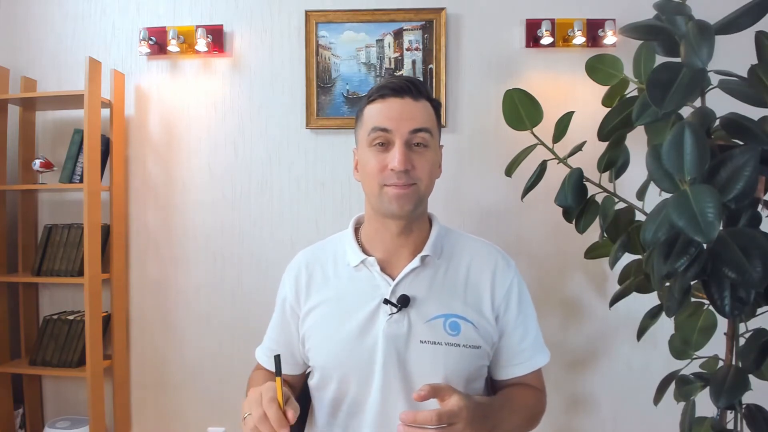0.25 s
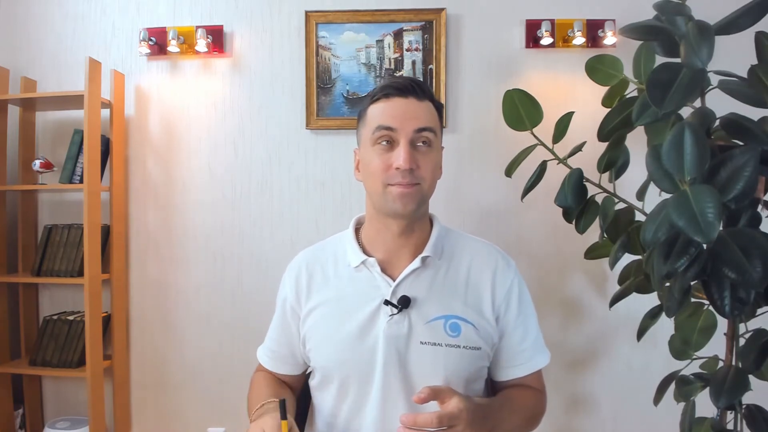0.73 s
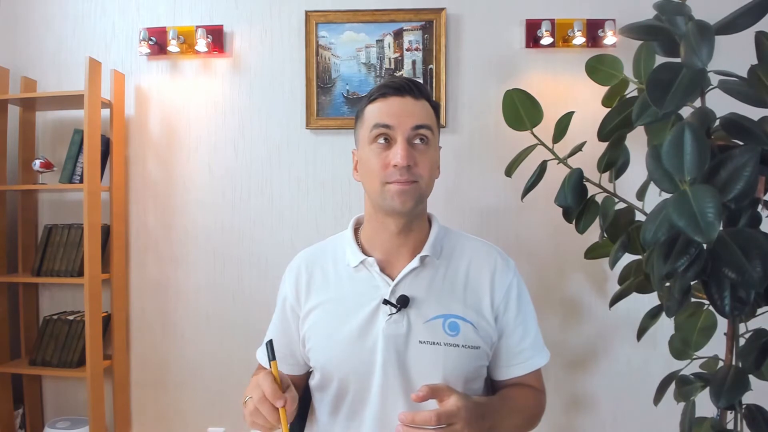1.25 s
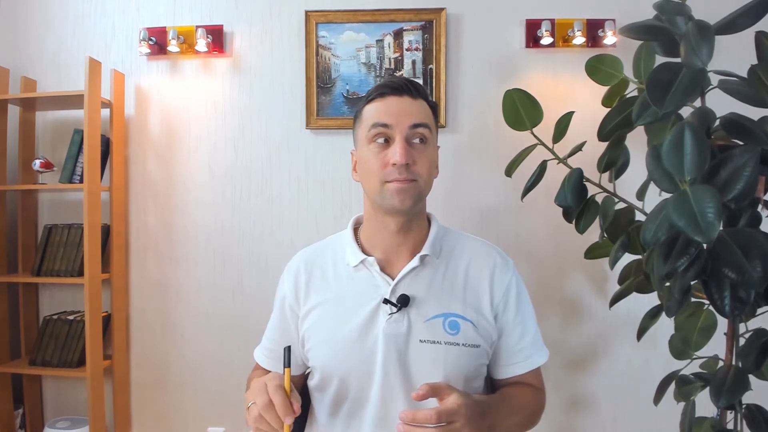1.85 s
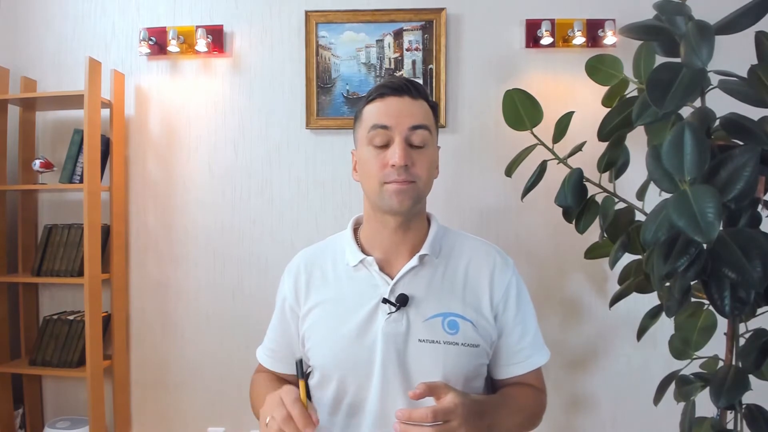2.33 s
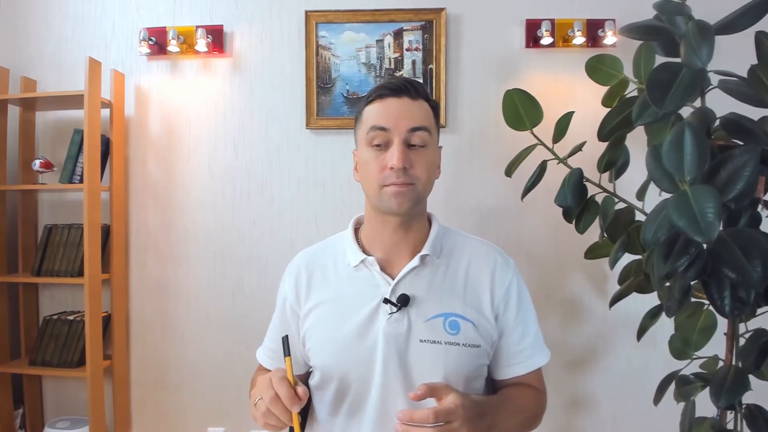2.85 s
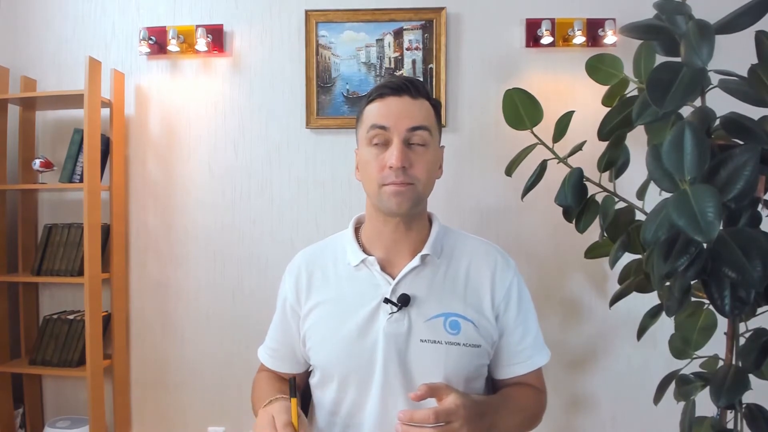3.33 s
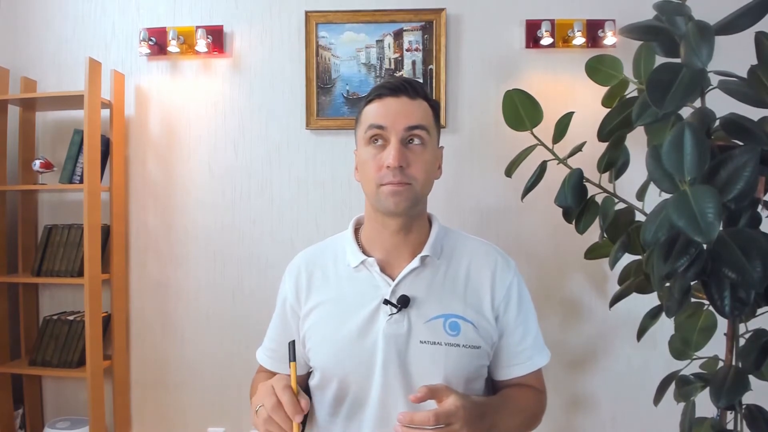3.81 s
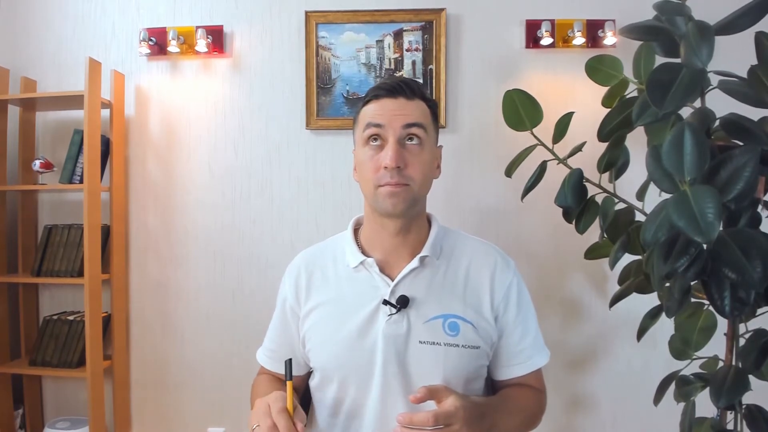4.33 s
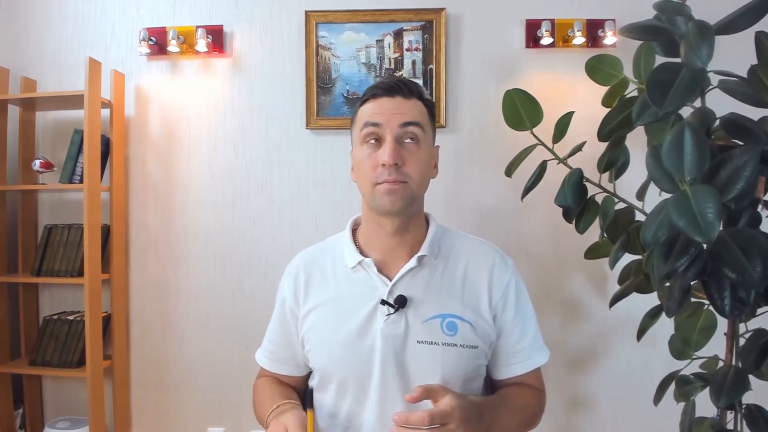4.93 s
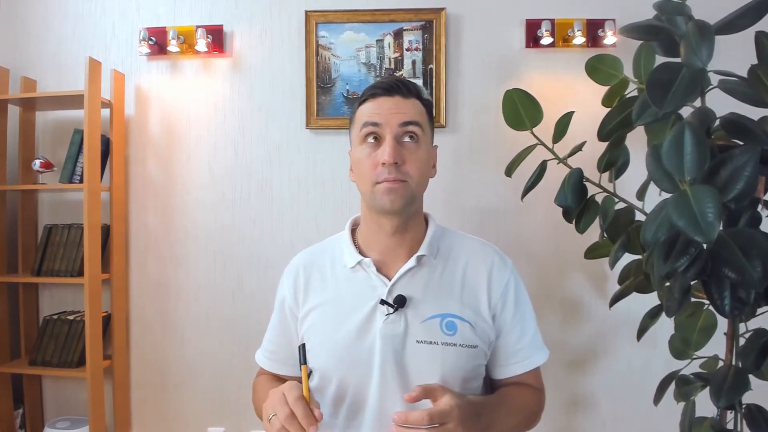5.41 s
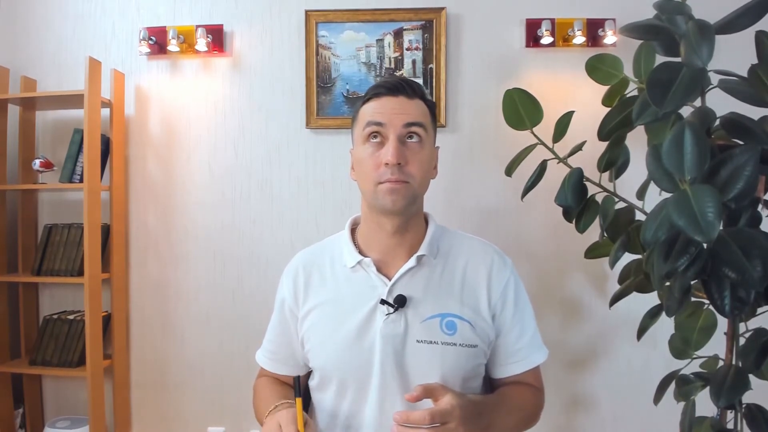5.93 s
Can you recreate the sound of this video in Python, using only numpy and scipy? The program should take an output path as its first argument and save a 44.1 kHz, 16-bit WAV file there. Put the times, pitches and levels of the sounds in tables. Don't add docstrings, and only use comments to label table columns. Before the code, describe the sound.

A pencil end knocks a hard desk top about every 0.84 seconds, crisp and dry with brief room ring, above quiet low hum.

```python
import sys
import numpy as np
from scipy import signal
from scipy.fft import rfft, irfft, next_fast_len
from scipy.io import wavfile
from scipy.ndimage import map_coordinates

SR = 44100
rng = np.random.default_rng(int(sys.argv[2]) if len(sys.argv) > 2 else 0)


def convert_level_to_amplitude(level_db):
    exponent = np.asarray(level_db, float) / 20
    return 10 ** exponent


def dump_mix(stems):
    frames = np.atleast_2d(stems).T
    limited = np.clip(frames, -1, 1)
    pcm = np.round(limited * 32767).astype(np.int16)
    wavfile.write(sys.argv[1], SR, pcm)


N = 271656


def unit(x):
    return x / np.sqrt(np.mean(x ** 2) + 1e-20)


def along(points, hz):
    f, v = np.transpose(points)
    return np.interp(np.log(hz + 1), np.log(f + 1), v)


def wobble(rate_hz):
    knots = rng.standard_normal(int(N * rate_hz / SR) + 4)
    return map_coordinates(knots, [np.arange(N) * rate_hz / SR])


def noise(spectrum):
    m = next_fast_len(N + SR)
    gain = convert_level_to_amplitude(along(spectrum, np.fft.rfftfreq(m, 1 / SR)))
    return unit(irfft(rfft(rng.standard_normal(m)) * gain, m)[:N])


def taps():
    # t/s, peak level/dB, tip hardness/dB, place (0 far, 1 middle, 2 near)
    strikes = [
        (-0.2, -4.5, 11.5, 0.8),
        (0.625, -8.5, 11, 0.034),
        (1.464, -7, 6.5, 1.02),
        (2.32, -8.5, 5.5, 1.82),
        (3.155, -7.5, 8, 1.85),
        (4.016, -8.5, 6, 2.33),
        (4.8476, -9, 7, 1.9),
        (5.6582, -10, 7.5, 3.2),
    ]
    room_db = -9
    out = np.zeros(N + 3 * SR)
    common = rng.standard_normal(SR)
    near = near_echoes()
    for s, db, hard_db, place in strikes:
        blow = convert_level_to_amplitude(db + 5.5) * desk(drive(place), hard_db)
        far = signal.fftconvolve(blow, tail(common + 2.18 * rng.standard_normal(SR)))
        at = round((s + .9999) * SR)
        out[at:][:len(far)] += convert_level_to_amplitude(room_db) * far
        out[at:][:len(blow)] += signal.fftconvolve(blow, near)[:len(blow)]
    return out[SR:SR + N]


def drive(place):
    spot_hz = [450, 1020, 1150, 1270, 1550, 1900, 2500]
    far_db = [-5.1, -6, 21, -11, -16.5, -8, -6]
    middle_db = [-6.3, -12.5, 5, 1, -38, -8, -12.2]
    near_db = [-7, -3, -28.5, -3, -17, -14, -5.5]
    drive_db = [np.interp(place, range(3), levels) for levels in zip(far_db, middle_db, near_db)]
    return [*zip(spot_hz, drive_db)]


def desk(drive_points, hard_db):
    # f/Hz, level/dB, t60/s
    modes = [(132.04, -40, 0.4), (325.3, -19.5, 0.047), (419.3, -12, 0.019), (651, -19, 0.054),
             (812.3, -33, 0.12), (1023, -15.5, 0.062), (1086.4, -26.5, 0.077), (1262, -14, 0.023),
             (1450, -19.5, 0.019), (1539.5, 8, 0.011), (1773, -12, 0.11), (1895, 3.5, 0.012),
             (1908, -19, 0.15), (2280, -15, 0.12), (2610, -12.5, 0.0092), (3000, -16.5, 0.011),
             (3280, -16.5, 0.0094), (3870, -26.5, 0.015), (4350, -19, 0.013), (4900, -21.5, .012),
             (5464, -18.5, .009), (6120, -20, .01), (7440, -43, .015), (9500, -49, .01),
             (10800, -36.5, .01)]
    contact_ms, ring_db, jolt_db = 0.024, 2.5, -7.5
    tick_db, grain_db, grain_t60_s = -19, -36, 0.014
    t = np.arange(SR // 2) / SR

    hz, db, t60 = np.transpose(modes)[:, :, None]
    hz = hz * (1 + .004 * rng.standard_normal(hz.shape))
    t60 = np.minimum(t60, np.where(hz > 3500, 40, 100) / hz)
    phase = np.pi * np.arange(len(hz))[:, None] ** 2 / 9
    level_db = db + along([*drive_points, (4000, hard_db)], hz) + rng.normal(0, 1, db.shape)
    ring = convert_level_to_amplitude(level_db - 60 * t / t60) * np.sin(2 * np.pi * hz * t + phase)
    swell = 1 - np.exp(-(t / .0017) ** 2)

    v = (t - .0005) / .00013
    jolt = (1 - 0.56 * v * v + .5 * v * (1 - abs(v))) * np.exp(-v * v / 3.0)

    u = t[:64] * 1000 / contact_ms
    force = u * u * np.exp(-u)
    motion = convert_level_to_amplitude(ring_db) * ring.sum(0) * swell + convert_level_to_amplitude(jolt_db) * jolt
    blow = np.convolve(motion, force / force.sum())[:len(t)]

    band = signal.butter(2, [4300, 12500], "bandpass", fs=SR, output="sos")
    tick = signal.sosfilt(band, np.arange(len(t)) == 18)
    grain = signal.sosfilt(band, rng.standard_normal(len(t)))
    grain = convert_level_to_amplitude(grain_db - 60 * t / grain_t60_s) * grain * (t > .0003)
    return blow + convert_level_to_amplitude(hard_db) * (convert_level_to_amplitude(tick_db) * tick + grain)


def near_echoes():
    # delay/s, level/dB
    walls = [(.0028, -4.5), (.0047, -26.5), (.0075, -14), (.0105, -9), (.016, -12.5), (.022, -12)]
    near = np.zeros(SR // 20)
    for k, (delay_s, gain_db) in enumerate(walls):
        near[round(delay_s * SR)] = (-1) ** k * convert_level_to_amplitude(gain_db)
    scatter = rng.standard_normal(130) * np.exp(-np.arange(130) / 40)
    near = np.convolve(near, scatter / np.linalg.norm(scatter))
    near = signal.sosfilt(signal.butter(2, 2800, fs=SR, output="sos"), near)
    near[0] = 1
    return near


def tail(white):
    # f/Hz, t60/s
    decay = [(100, 0.87), (300, 0.63), (1000, 0.8), (2000, 0.86), (3500, 0.7), (6000, 0.58), (12000, 0.18)]
    # f/Hz, level/dB
    spread = [(80, -1.5), (200, 14.5), (500, -2), (900, 10), (1150, -1.5), (1300, 6.5), (2000, 5.5),
              (2600, 7.5), (3700, -5.5), (5000, 2), (8000, 5.5), (15000, 0.5)]
    hz, t, z = signal.stft(white, SR, nperseg=512)
    level_db = along(spread, hz)[:, None] - 60 * t / along(decay, hz)[:, None]
    h = signal.istft(z * convert_level_to_amplitude(level_db), SR, nperseg=512)[1]
    h = h * (1 - np.exp(-(np.arange(len(h)) / SR / 0.012) ** 2))
    return h / np.linalg.norm(h)


def drones():
    # start t/s, end t/s, f/Hz, rms level/dB
    bursts = [
        (4.524, 4.698, 162.4, -63.5),
        (4.983, 5.166, 162.2, -65),
    ]
    edge_s = 0.016
    t = np.arange(N) / SR
    out = np.zeros(N)
    for start_s, end_s, hz, db in bursts:
        gate = np.clip(np.minimum(t - start_s, end_s - t) / edge_s, 0, 1)
        out += np.sqrt(2) * convert_level_to_amplitude(db) * gate * np.sin(2 * np.pi * hz * t)
    return out


def hum():
    line_hz = [50, 100, 21.9, 12.5, 39.8, 67.5]
    line_db = [-47, -90, -53, -66, -95, -75]
    # f/Hz, level/dB per Hz
    rumble = [(2, 1.5), (4, -17), (13, -6.5), (25, -18), (60, -7.5), (110, -9), (150, -54)]
    turn = 2 * np.pi * np.arange(N) / SR
    out = convert_level_to_amplitude(-63.0) * noise(rumble)
    for hz, db in zip(line_hz, line_db):
        level_db = db + .3 * wobble(4)
        out += np.sqrt(2) * convert_level_to_amplitude(level_db) * np.sin(hz * turn + 2 * np.pi * rng.random())
    return out


def hiss():
    # f/Hz, level/dB per Hz
    density = [(100, -27.5), (140, -0.5), (350, -0.5), (500, -3), (860, -1.5), (1300, -5), (2200, -6.5),
               (3500, -13), (8000, -14.5), (13000, -14.5), (15800, -13)]
    # f/Hz, level/dB per Hz
    top_point = (15900, -70)
    sway_db = .6 * wobble(10)
    return convert_level_to_amplitude(-67 + sway_db) * noise([*density, top_point])


def scene():
    return (taps() + drones() + hum() + hiss())[None]


def starve(x):
    starved = [0.082, 0.165, .358, 0.61, 1.449, 1.571, 1.958, 2.169, 2.303, 2.404, 2.553, 2.598, 2.701,
               2.748, 3.364, 3.472, 3.493, 3.513, 3.558, 3.603, 4.282, 4.666, 5.135, 5.181, 5.2, 5.245,
               5.283, 5.303, 5.323, 6.075]
    corner_hz, length_s, fade_s = 3100, .016, .012
    hz, t, z = signal.stft(x, SR, nperseg=512, noverlap=448)
    gain = np.ones(z.shape[1:])
    for s in starved:
        lost = (hz > corner_hz) & (rng.random(len(hz)) > .04)
        depth = np.clip((length_s / 2 - abs(t - s)) / fade_s + .5, 0, .97)
        gain -= gain * lost[:, None] * depth
    return signal.istft(z * gain, SR, nperseg=512, noverlap=448)[1][:, :N]


def band_limit(x):
    return signal.sosfilt(signal.butter(12, 16540, fs=SR, output="sos"), x)


def record(dry):
    rounded = dry / (1 + abs(dry / .43) ** 3) ** (1 / 3)
    rounded = signal.sosfilt(signal.butter(6, 15500, fs=SR, output="sos"), rounded)
    offset = -.0685
    return band_limit(starve(rounded) + offset)


dry = scene()
out = record(dry)
dump_mix(out)
```